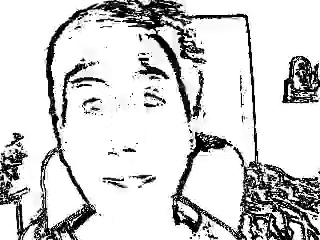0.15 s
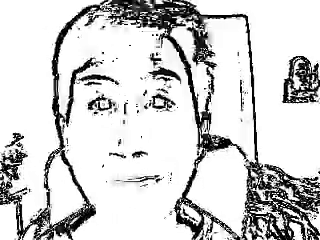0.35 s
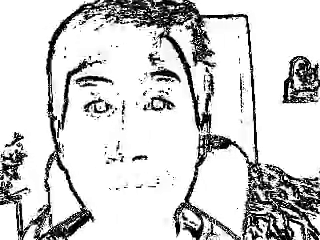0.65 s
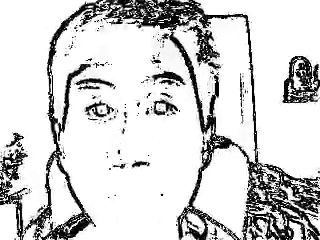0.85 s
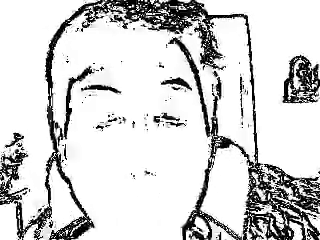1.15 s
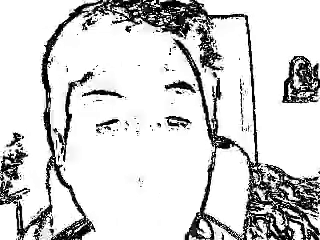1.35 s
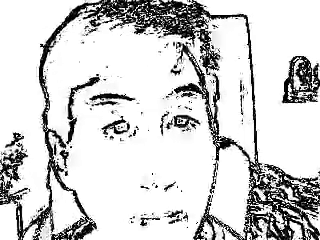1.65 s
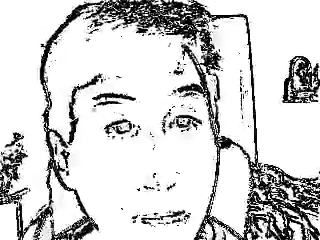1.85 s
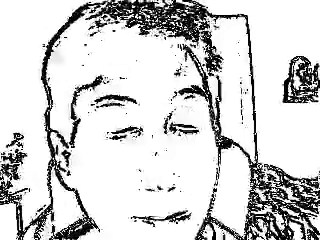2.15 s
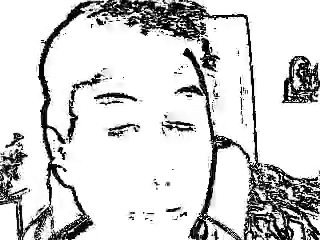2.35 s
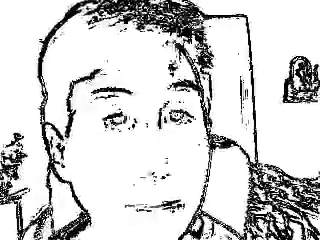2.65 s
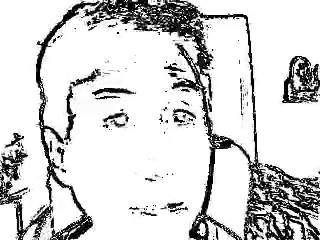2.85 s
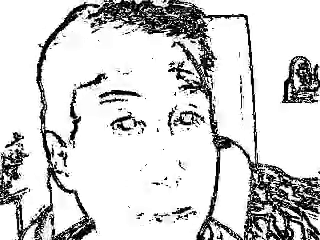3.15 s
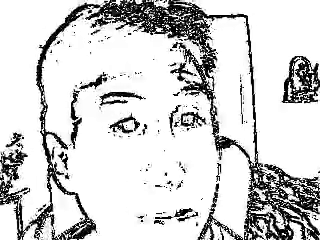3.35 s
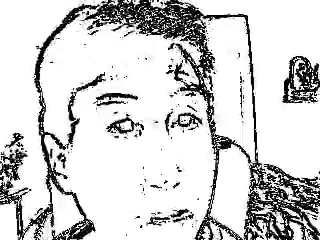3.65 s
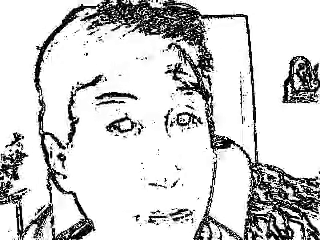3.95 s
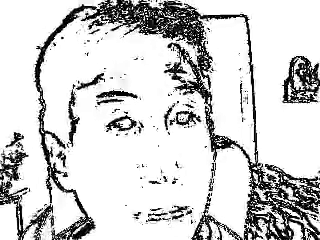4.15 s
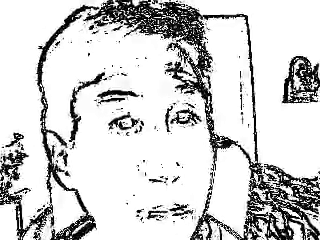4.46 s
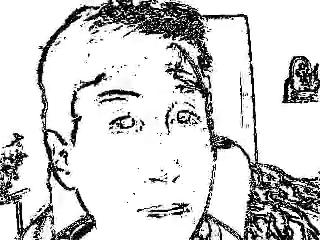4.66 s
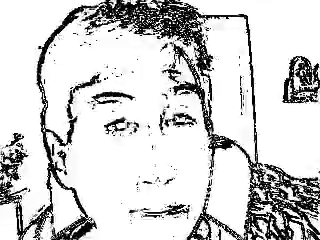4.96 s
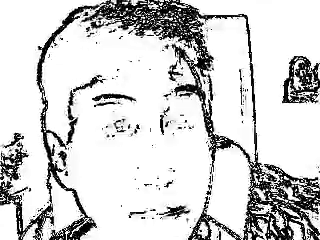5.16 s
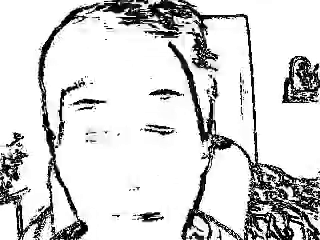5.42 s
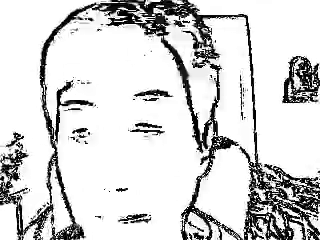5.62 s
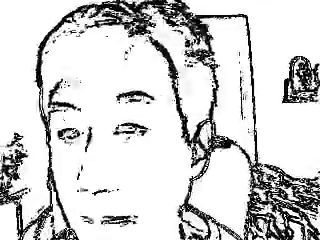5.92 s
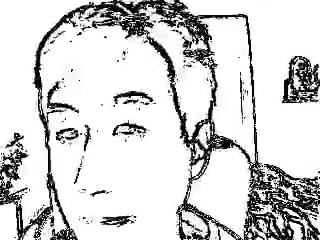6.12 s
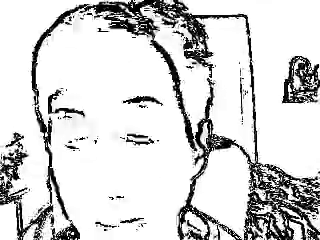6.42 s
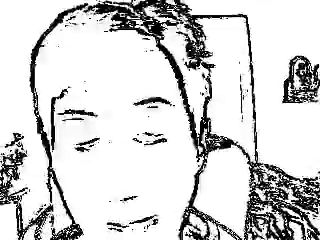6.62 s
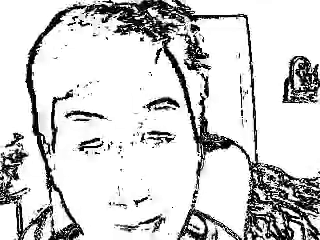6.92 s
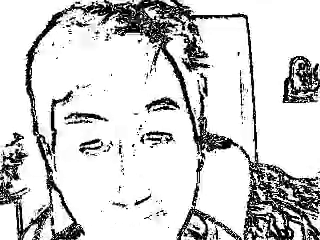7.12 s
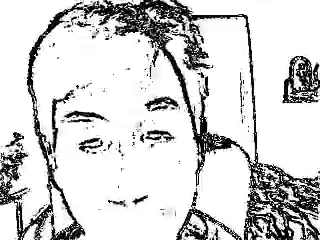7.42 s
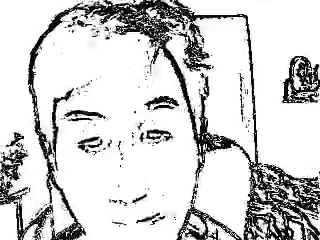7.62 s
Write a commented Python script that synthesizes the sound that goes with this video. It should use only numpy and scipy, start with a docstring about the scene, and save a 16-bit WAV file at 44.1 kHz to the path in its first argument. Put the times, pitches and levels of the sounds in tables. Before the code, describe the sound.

A computer's cooling fan hums low and steadily close to its built-in microphone, with gentle rushing air and a faint, thin motor whine. A soft brush of cloth comes right at the start, then a tiny doubled tick, later a fainter rustle and a single dry tick, and one more tick near the end. Small quiet dry room, slight hiss.

```python
"""Quiet room with a computer fan

A built-in computer microphone hears the cooling fan: sines on multiples of its speed, plus rushing shaped noise.
A motor whines faintly as a few sines. Three small dry ticks (the first doubled) are impulses through resonances.
Cloth rustles softly twice as swells of noise. Mains hum, steady tones and a low rumble lie beneath;
the preamp hisses in each channel."""
import sys
import numpy as np
from scipy import signal
from scipy.fft import rfft, irfft
from scipy.io import wavfile

SR = 44100
rng = np.random.default_rng(int(sys.argv[2]) if len(sys.argv) > 2 else 0)


def put_to_file(sound):
    """Save the sound as 16-bit audio at rate SR, in the file named by the first command-line argument."""
    columns = np.atleast_2d(sound).T  # one column per channel
    safe = np.clip(columns, -1, 1)
    whole_steps = np.round(safe * 32767)
    wavfile.write(sys.argv[1], SR, whole_steps.astype(np.int16))


N = 343274  # length in samples


def amp(db):
    """Decibels to gain."""
    return 10 ** (np.asarray(db) / 20)


def colour(points, hz):
    """Gain curve through a few spectrum points, joined on a log-frequency axis."""
    point_hz, point_db = np.transpose(points)
    return amp(np.interp(np.log(hz + 1), np.log(point_hz + 1), point_db))


def noise(points):
    """White noise filtered to the given density per Hz."""
    spectrum = rfft(rng.standard_normal(N))
    gain = colour(points, np.fft.rfftfreq(N, 1 / SR))
    return irfft(spectrum * gain, N) * np.sqrt(SR / 2)


def wander(rate_hz):
    """Slow random drift of rms 1, with little movement much faster than the rate."""
    spectrum = rfft(rng.standard_normal(N))
    lowpass = np.exp(-(np.fft.rfftfreq(N, 1 / SR) / rate_hz) ** 2)
    drift = irfft(spectrum * lowpass, N)
    return (drift - drift.mean()) / drift.std()


def stack(pitch_hz, orders):
    """Sines on whole multiples of a pitch curve, each with a random starting phase."""
    turns = np.cumsum(pitch_hz * np.ones(N)) / SR
    total = np.zeros(N)
    for order, level_db in orders:
        phase = 2 * np.pi * (round(order) * turns + rng.random())
        total += np.sqrt(2) * amp(level_db) * np.sin(phase)  # root 2 turns rms into peak
    return total


def add(mix, start_s, sound):
    """Lays a sound into the mix, cut off at the end of the mix."""
    part = mix[round(start_s * SR):][:len(sound)]
    part += sound[:len(part)]


def causal(gain):
    """Minimum-phase click with this gain over the full circle of frequencies: no energy before its onset."""
    log_gain = np.log(gain + 1e-4)  # the small floor keeps the logarithm finite
    return np.fft.ifft(np.exp(np.conj(signal.hilbert(log_gain)))).real


# Fan hum, the ninth order is the blades passing: order (multiple of the speed), level_db (rms)
FAN_ORDERS = [(1, -33), (2, -54), (3, -67), (4, -71), (5, -72), (7, -70), (8, -68), (9, -57), (11, -71)]
# Air rushing through the vent: freq_hz, density_db (per Hz)
AIR_SPECTRUM = [(60, -100), (300, -83), (750, -83), (1190, -78), (1450, -83.5), (1900, -86), (2350, -90.5),
                (3350, -94.5), (3850, -103.2), (4700, -103), (4950, -100), (5250, -106), (6300, -106),
                (7300, -116), (11000, -130)]
# Turns per second at the start and once steady, and the time scale of the creep between them
FAN_START_HZ, FAN_STEADY_HZ, SETTLE_S = 100.11, 100.49, 2.15


def fan():
    """A slightly unbalanced rotor creeps up to its speed and shakes the case every turn; its air swells a little."""
    t = np.arange(N) / SR
    speed_hz = FAN_STEADY_HZ + (FAN_START_HZ - FAN_STEADY_HZ) * np.exp(-(t / SETTLE_S) ** 2)
    speed_hz = speed_hz * (1 + 0.00042 * wander(rate_hz=2.5))
    hum = stack(speed_hz, FAN_ORDERS) * amp(0.15 * wander(rate_hz=6.8))
    air = noise(AIR_SPECTRUM) * amp(0.51 * wander(rate_hz=12))
    return hum + air


# Motor whine: order (multiple of its pitch), level_db (rms)
WHINE_ORDERS = [(1, -51.9), (2, -68.9), (5, -89.2)]
WHINE_HZ = 1320.9


def whine():
    """A small motor holds its pitch to within a fraction of a percent; thin overtones ride on top."""
    pitch_hz = WHINE_HZ * (1 + 0.000484 * wander(rate_hz=1.39))
    return stack(pitch_hz, WHINE_ORDERS) * amp(0.76 * wander(rate_hz=6.7))


# Ticks: start_s, then for the low, middle and high resonance each: pitch_hz, height_db, half_width_hz
TICKS = [(1.1974, 1320, -28, 250, 2700, -6, 250, 5500, -23, 900),
         (1.2036, 1520, 1.5, 420, 2850, 10, 170, 5340, -17, 380),
         (2.9645, 1590, 6.5, 220, 2720, -2.5, 560, 4330, -11.5, 430),
         (7.4414, 1660, 7, 130, 3080, -4.5, 560, 6200, -19.5, 900)]
# The microphone's port takes this notch out of every tick
NOTCH_HZ, NOTCH_WIDTH_HZ, NOTCH_DB = 3790, 200, -7
ECHO_S = 0.0092  # delay of the near wall's answer


def ticks(size=1024, low_hz=800, top_hz=7000, echo_db=-20, tail_db=-19, tail_t60=0.13):
    """Each tick is one impulse through three resonances; a near wall and the dry room answer faintly."""
    freq_hz = abs(np.fft.fftfreq(size, 1 / SR))
    top_cut = 1 + (freq_hz / top_hz) ** 24
    low_cut = 1 + (low_hz / (freq_hz + 1)) ** 6
    band = 1 / np.sqrt(top_cut * low_cut)
    notch = amp(NOTCH_DB * np.exp(-((freq_hz - NOTCH_HZ) / NOTCH_WIDTH_HZ) ** 2))
    close = np.zeros(N)
    for start_s, *modes in TICKS:
        body = np.zeros(size)
        for pitch_hz, height_db, half_width_hz in np.reshape(modes, (-1, 3)):
            offset = (freq_hz - pitch_hz) / half_width_hz
            body += amp(height_db) / (1 + 0.5 * offset ** 2) ** 1.5
        click = -causal(body * band * notch)  # the first swing is inverted
        add(close, start_s, click)
        add(close, start_s + ECHO_S, amp(echo_db) * click)
    tail_t = np.arange(SR // 2) / SR
    tail = rng.standard_normal(len(tail_t)) * amp(-60 * tail_t / tail_t60)
    tail = tail / np.linalg.norm(tail)  # unit energy
    return close + amp(tail_db) * signal.oaconvolve(close, tail)[:N]


# Rustles: centre_s, length_s, gain_db (on the spectrum below)
RUSTLES = [(0.097, .11, 3), (2.47, .2, -8)]
# Colour of the cloth: freq_hz, density_db (per Hz)
RUSTLE_SPECTRUM = [(1500, -110), (2700, -90), (3700, -104), (4350, -94.5), (4900, -106), (6200, -102),
                   (7800, -112), (10000, -128)]


def rustle():
    """Soft brushes of cloth, each a smooth bell-shaped swell of fine friction noise."""
    t = np.arange(N) / SR
    stroke = np.zeros(N)
    for centre_s, length_s, gain_db in RUSTLES:
        stroke += amp(gain_db) * np.exp(-2 * np.pi * ((t - centre_s) / length_s) ** 2)
    return stroke * noise(RUSTLE_SPECTRUM)


# Mains hum and weak steady tones of the case: pitch_hz, level_db (rms)
STEADY_TONES = [(47.0, -57.9), (60.0, -49.9), (90.1, -63.0), (232.8, -69.9), (264.0, -74.0), (575.0, -72.6),
                (1556.1, -72.2)]
# Low rumble of room and desk: freq_hz, density_db (per Hz)
RUMBLE_SPECTRUM = [(10, -63.5), (45, -69.5), (72, -76.5), (135, -80), (175, -74.5), (215, -81.5),
                   (330, -88), (800, -120)]


def room():
    """Steady tones, mostly low, over a dull rumble of filtered noise."""
    tones = sum(stack(pitch_hz, [(1, level_db)]) for pitch_hz, level_db in STEADY_TONES)
    return tones + noise(RUMBLE_SPECTRUM)


def scene():
    """One microphone feeds both channels alike."""
    mono = fan() + whine() + ticks() + rustle() + room()
    return np.tile(mono, (2, 1))


# Preamp hiss: freq_hz, density_db (per Hz)
HISS_SPECTRUM = [(1500, -128), (3000, -113), (5000, -108.8), (8000, -108.2), (15500, -109.2)]
EDGE_HZ = 15850  # upper band limit


def record(dry):
    """Each channel adds its own preamp hiss; the level fades in slightly; a lowpass limits the band."""
    wet = dry + np.array([noise(HISS_SPECTRUM), noise(HISS_SPECTRUM)])
    t = np.arange(N) / SR
    wet = wet * amp(-3.5 * np.exp(-t / 0.033))  # starts 3.5 dB low, time constant 33 ms
    lowpass = signal.firwin(511, EDGE_HZ, window=("kaiser", 9), fs=SR)
    return signal.oaconvolve(wet, lowpass[None], "same")


dry = scene()
out = record(dry)
put_to_file(out)
```